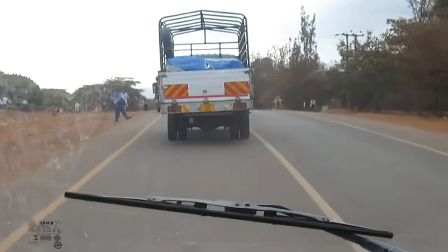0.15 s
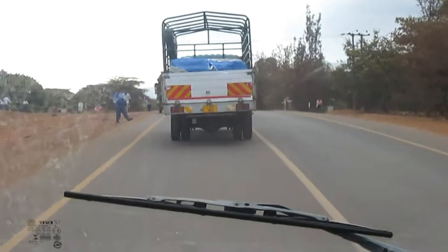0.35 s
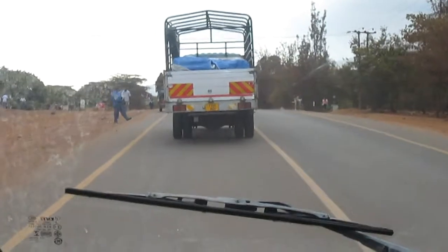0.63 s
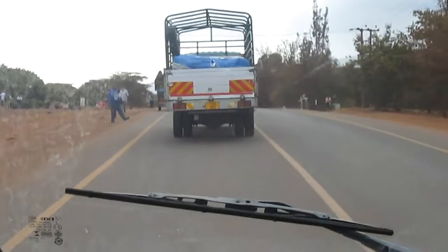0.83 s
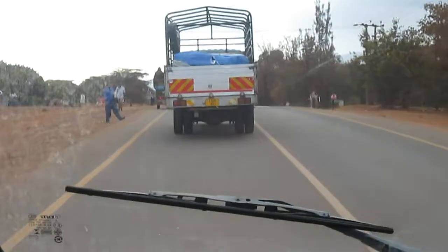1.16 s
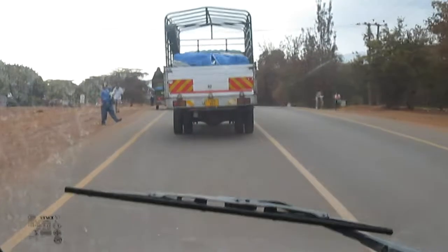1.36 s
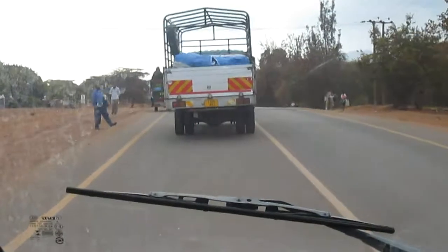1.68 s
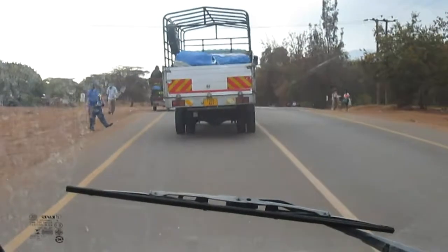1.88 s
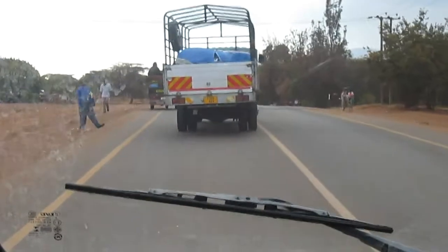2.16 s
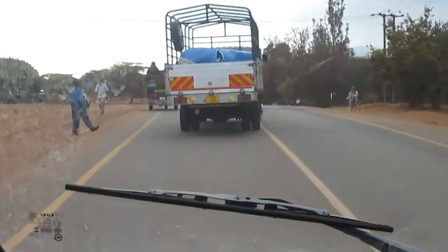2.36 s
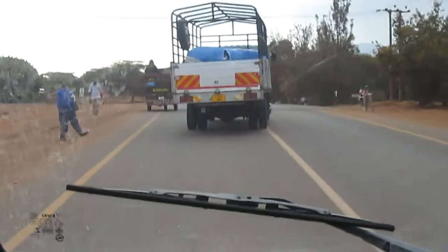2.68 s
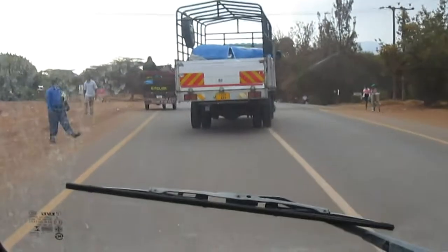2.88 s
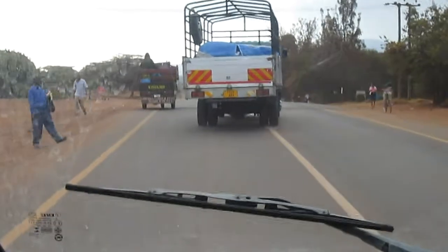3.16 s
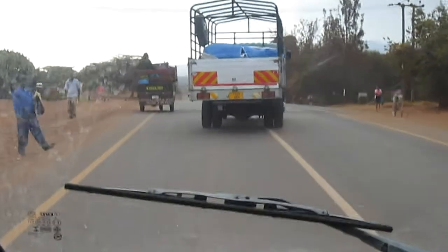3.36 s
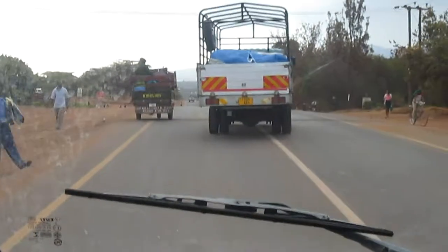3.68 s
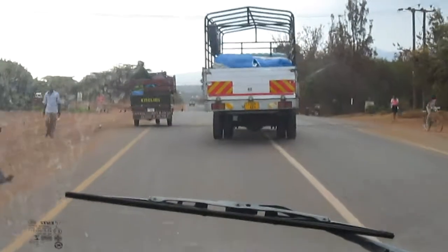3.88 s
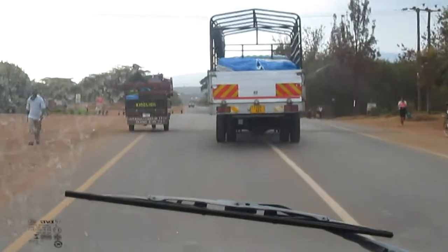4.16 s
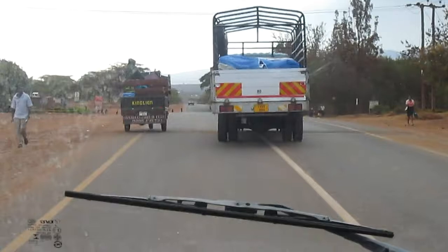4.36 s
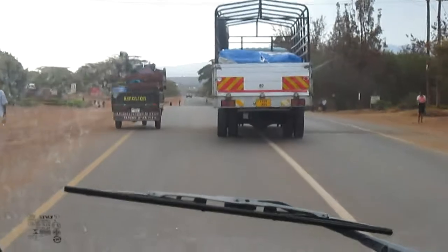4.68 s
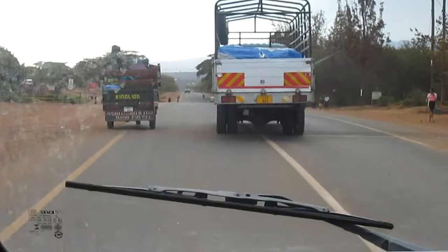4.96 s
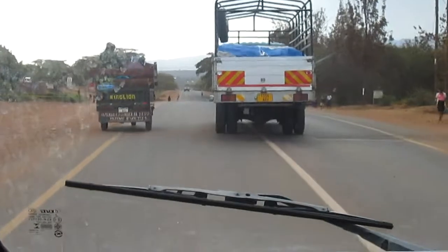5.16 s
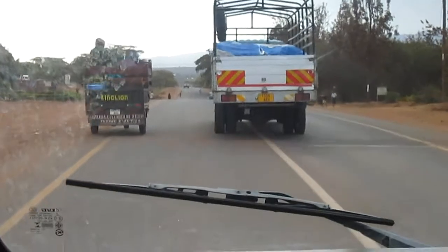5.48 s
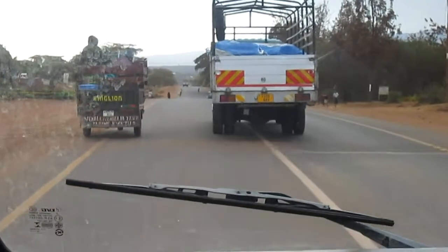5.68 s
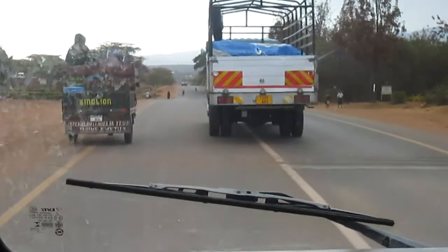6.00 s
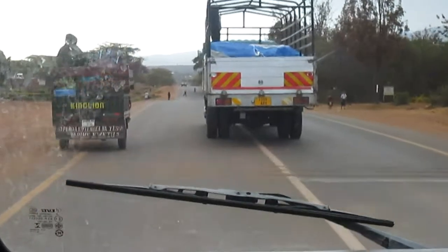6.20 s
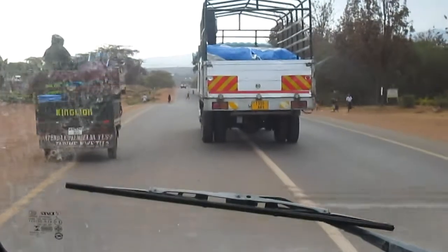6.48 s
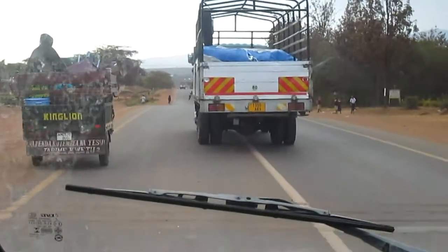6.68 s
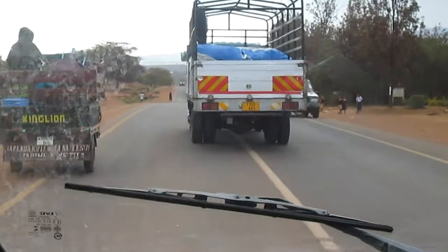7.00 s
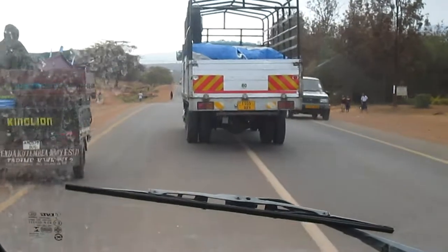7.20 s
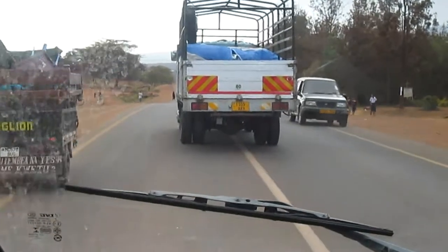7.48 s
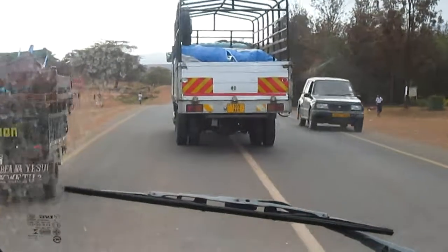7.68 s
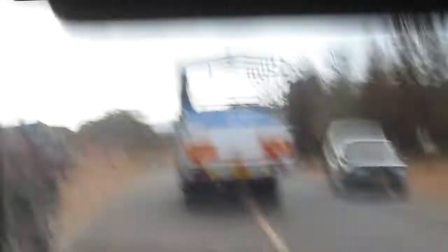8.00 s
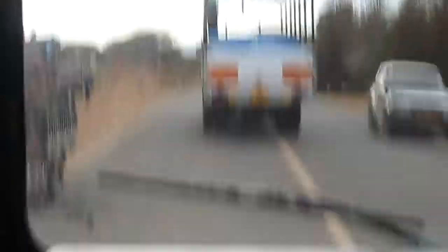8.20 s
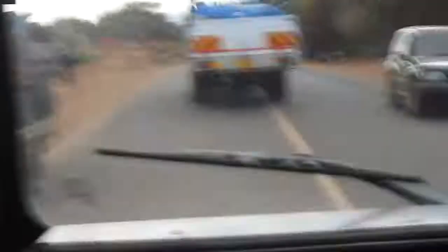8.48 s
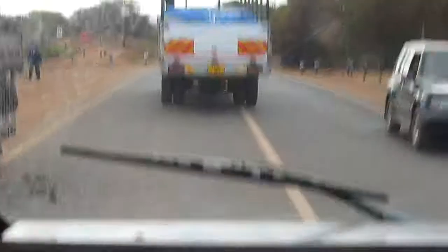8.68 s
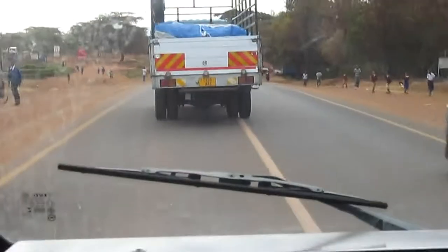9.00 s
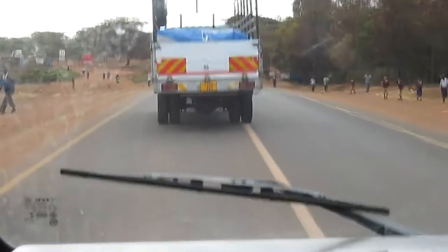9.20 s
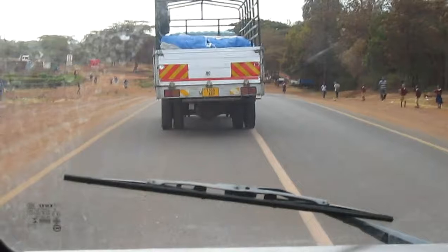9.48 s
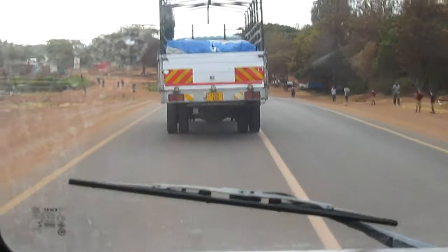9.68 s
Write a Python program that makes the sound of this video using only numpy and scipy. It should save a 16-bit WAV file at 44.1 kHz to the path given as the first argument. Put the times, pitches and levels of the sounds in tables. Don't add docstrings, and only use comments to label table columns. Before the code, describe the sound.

Steady diesel hum and tyre rumble in a cab, with faint belt chirps, two tiny motor buzzes, hard thumps and shaky handling noise.

```python
import sys
import numpy as np
from scipy import signal
from scipy.fft import rfft, irfft, next_fast_len
from scipy.io import wavfile
from scipy.ndimage import uniform_filter1d

SR = 44100
rng = np.random.default_rng(int(sys.argv[2]) if len(sys.argv) > 2 else 0)


def amplitude_ratio(level_db):
    exponent = np.asarray(level_db, float) / 20
    return 10 ** exponent


def dump(signal):
    limited = np.clip(np.atleast_2d(signal).T, -1, 1)
    pcm = np.round(limited * 32767).astype(np.int16)
    wavfile.write(sys.argv[1], SR, pcm)


N = 434385
TIME = np.arange(N) / SR
STEP = 40


def rms_one(x):
    return x / np.sqrt(np.mean(x ** 2) + 1e-20)


def in_time(table):
    s, *columns = np.transpose(table)
    return [np.interp(TIME, s, column) for column in columns]


def chance(rate_hz):
    r = np.exp(-2 * np.pi * STEP * rate_hz / SR)
    lead_in = 2000
    noise = rng.standard_normal(len(TIME[::STEP]) + lead_in)
    return rms_one(signal.lfilter([1], [1, -2 * r, r * r], noise)[lead_in:])


def smooth(steps):
    return np.interp(TIME, TIME[::STEP], steps)


def drift(rate_hz):
    return smooth(chance(rate_hz))


def resonate(x, hz, width_hz):
    r = np.exp(-np.pi * width_hz / SR)
    zeros = np.array([1, 0, -1]) * (1 - r * r) / 2
    poles = [1, -2 * r * np.cos(2 * np.pi * hz / SR), r * r]
    return signal.lfilter(zeros, poles, x + 1e-18)


def colour(spectrum):
    hz, db = np.transpose(spectrum)
    size = next_fast_len(N)
    grid_hz = np.fft.rfftfreq(size, 1 / SR) + 1
    gain = amplitude_ratio(np.interp(np.log(grid_hz), np.log(hz), db))
    return rms_one(irfft(rfft(rng.standard_normal(size)) * gain, size)[:N])


def band(x, low_hz, high_hz, order=2):
    return signal.sosfilt(signal.butter(order, [low_hz, high_hz], "band", fs=SR, output="sos"), x)


def gain_control():
    # start in seconds, quick part in dB, lasting part in dB.
    ducks = [
        (4.981, 8.5, 10),
        (5.6, 1, 12.5),
        (7.265, 8.5, 10),
        (8.06, 2, 10),
        (8.6, 0, 12.5),
    ]
    attack_s, quick_s, lasting_db_per_s = 0.0127, 0.303, 3.5
    depths_db = []
    for start, quick_db, lasting_db in ducks:
        since = np.clip(TIME - start, 0, None)
        recovery_db = quick_db * np.exp(-since / quick_s)
        recovery_db = recovery_db + np.maximum(lasting_db - lasting_db_per_s * since, 0)
        depths_db.append(np.minimum(since / attack_s, 1) * recovery_db)
    return -np.max(depths_db, axis=0)


def road_levels(gain_db):
    # time in seconds, panel noise in dB, unevenness in dB, coarseness in dB.
    surface = [(0, -30.5, -3.5, -1), (.25, -35, 1.05, 1.5), (.6, -34.5, -8, 2), (1.0, -34.5, -3, -1),
               (1.5, -33.5, 3.5, -1), (1.75, -35.5, 0.7, 0), (2.3, -34, 5.5, -2), (2.75, -34, 2.5, -3.5),
               (3.3, -31.5, 0, 1), (3.9, -29.5, -0.67, 0.03), (4.4, -31.5, 3, -1), (4.65, -33, 3.5, 2.5),
               (5.3, -33, 0.68, -1.5), (6.2, -33, -2, 0.04), (6.9, -33, 3.5, 1.08), (7.6, -33.5, 0.07, 0.4),
               (9.2, -33, 0.5, -2.5), (9.85, -30, -3.5, -7)]
    # centre in seconds, half length in seconds, lift of
    # heave, of rumble and of panel noise in dB.
    jolts = [
        (5.57, 0.1, 5, 9.7, 0),
        (7.434, 0.054, 0.5, 6.8, -0.5),
        (7.977, 0.171, 17.3, 0.5, 3.5),
        (8.391, 0.146, 4, 16.5, 13),
        (8.698, 0.126, 10.4, 6.2, 0.5),
    ]
    cruise_db = -34
    belt_duck_share = 0.884
    panel_db, uneven_db, coarse_db = in_time(surface)
    lifts_db = sum(np.outer(lifts, np.exp(-((TIME - s) / half_s) ** 2)) for s, half_s, *lifts in jolts)
    heave, rumble, panel = lifts_db + gain_db
    heave_db = panel_db + 11 + uneven_db + heave + 2.5 * drift(2.8)
    rumble_db = panel_db + 10 + coarse_db + rumble + 1.15 * drift(3)
    chirp_db = cruise_db - 20.5 + 1.17 * (panel_db - cruise_db) + panel - (1 - belt_duck_share) * gain_db
    return heave_db, rumble_db, panel_db + panel, chirp_db


def road(turn, heave_db, rumble_db, panel_db, patchy_db, throb):
    # frequency in Hz, level in dB per Hz.
    roar_colour = [(12, -9), (22, -5), (31, -8), (55, -4.5), (100, -7.5), (170, -8), (400, -15.5),
                   (520, -23.5), (734, -21), (1460, -26.5), (3900, -41.5), (5500, -48), (10100, -55),
                   (15500, -72.5)]
    # frequency in Hz, width in Hz, level over the roar in dB.
    panels = [(550.8, 41, 6), (965.3, 20, 8.5), (1106, 61, 1.5), (1494, 32, 2), (1799, 79, 5.5),
              (2150, 37, 2), (2532, 51, 3.5), (3093, 72, 4)]
    roar = colour(roar_colour)
    roar = roar + sum((amplitude_ratio(db) - 1) * resonate(roar, hz, width_hz) for hz, width_hz, db in panels)
    anchors = [band(roar, 15, 48).std(), band(roar, 160, 450).std(), band(roar, 700, 3500).std()]
    levels_db = np.array([heave_db, rumble_db, panel_db])[:, ::STEP] - 20 * np.log10(anchors)[:, None]
    size = next_fast_len(N)
    spectrum, grid = rfft(roar, size), np.log2(np.fft.rfftfreq(size, 1 / SR) + 1)
    cycle = np.cos(turn[::STEP] / 2 - .6)
    out, together = np.zeros(N), chance(15)
    for octave in np.arange(3.5, 14.6, .5):
        part = irfft(spectrum * np.clip(1 - np.abs(grid - octave) / .5, 0, 1), size)[:N]
        place = np.interp(octave, np.log2([40, 220, 900]), [0, 1, 2])
        level_db = sum(np.clip(1 - abs(place - k), 0, 1) * levels_db[k] for k in range(3))
        fired = 1 + throb * (place > 1) * cycle
        flicker_db = patchy_db * (0.73 * together + chance(42))
        out += part * smooth(fired * amplitude_ratio(level_db + flicker_db))
    return out


def belt(turn, chirp_db):
    # frequency in Hz, width in Hz, level in dB.
    chirps = [
        (4919, 900, 1),
        (5538, 1000, -0.5),
        (9830, 1300, -13.5),
    ]
    lap = turn / 3.07 + 0.23
    out = 0
    for k, (hz, width_hz, db) in enumerate(chirps):
        slip = amplitude_ratio(2.63 * np.cos(lap + .5 * k + .5 * drift(3.3)) + 1.78 * drift(25))
        squeal = resonate(resonate(rng.standard_normal(N), hz, width_hz), hz, width_hz)
        out = out + amplitude_ratio(db) * rms_one(slip * squeal)
    return amplitude_ratio(chirp_db - 1.0) * out


def lens_motor(gain_db):
    # start in seconds, end in seconds, level in dB.
    runs = [
        (1.933, 2.471, -57.5),
        (7.085, 7.82, -56),
    ]
    # frequency in Hz, width in Hz, level in dB.
    barrel = [(5880, 120, 0), (6600, 120, 2), (7500, 120, -2), (8620, 150, -14), (11260, 150, -13),
              (11990, 200, -19), (12570, 200, -17), (13850, 250, -21), (14890, 250, -22)]
    teeth_per_s = 82 * amplitude_ratio(.8 * drift(30))
    ticks = np.diff(np.floor(np.cumsum(teeth_per_s) / SR), prepend=0) * amplitude_ratio(rng.normal(0, 1.4, N))
    ticks = ticks + 0.072 * rng.standard_normal(N)
    since_s = np.minimum(*[np.where(TIME > run[0], TIME - run[0], 9) for run in runs])
    top = amplitude_ratio(-9.0 * np.clip((since_s - .26) / .08, 0, 1))
    buzz = 0
    for hz, width_hz, db in barrel:
        ring = resonate(resonate(ticks, hz, width_hz), hz, 3 * width_hz)
        buzz = buzz + (top if hz > 8000 else 1) * amplitude_ratio(db) * rms_one(ring)
    running = sum(amplitude_ratio(db) * ((TIME > start) & (TIME < end)) for start, end, db in runs)
    return amplitude_ratio(gain_db + 1.5 * drift(8)) * uniform_filter1d(running, size=800) * buzz


def hand():
    # start in seconds, end in seconds, level in dB, seconds to swell and fade by 20 dB.
    rubs = [(5.292, 5.31, -75.5, 0.04), (5.39, 5.415, -70.5, 0.22), (5.475, 5.501, -72.5, 0.18),
            (5.841, 5.844, -76, 0.04), (6.088, 6.092, -74, 0.08), (7.873, 7.963, -54, 0.1257),
            (7.97, 8.121, -57, 0.1029), (8.29, 8.468, -55.5, 0.1418), (8.5, 8.557, -63, .08),
            (8.6, 8.718, -76, 0.08), (9.699, 9.86, -68.5, 0.24)]
    # frequency in Hz, level in dB per Hz.
    scratch_colour = [(120, -46), (200, 3.5), (304, 7), (515, -7), (874, -4), (1380, -12), (8500, -31.5),
                      (15500, -45)]
    scratch = colour(scratch_colour) * amplitude_ratio(3.94 * drift(120) + 0.91 * drift(27))
    scratch = scratch + 0.67 * resonate(scratch, 3725, 500)
    levels_db = []
    for start, end, db, fade_s in rubs:
        outside_s = np.maximum(np.maximum(start - TIME, TIME - end), 0)
        levels_db.append(db - 20 * outside_s / fade_s)
    return amplitude_ratio(np.max(levels_db, axis=0)) * scratch / band(scratch, 10370, 17840).std()


def knocks():
    # time in seconds, thud in dB, thud in Hz, crack in dB.
    pushes = [(5.03, -16, 170, -39), (5.489, -8, 113.6, -35), (5.503, -6.5, 116.6, -34.5),
              (5.537, -14.5, 180, -24), (5.585, -10.5, 250, -23.5), (5.596, -16, 167, -39),
              (7.4804, -6, 100.4, -23), (8.382, -6.5, 253, -23.5), (8.482, -5, 281, -29.5)]
    # time in seconds, thud in dB, thud in Hz, crack in dB.
    pulls = [(4.864, -2.5, 123.5, -17.5), (4.968, -6, 260, -14.5), (4.9725, 2, 69.7, -6),
             (4.978, -4, 330, -5.5), (5.084, -7.5, 143, -11.5), (5.132, -14, 170, -34.5),
             (5.562, -4, 238.4, -14.5), (5.572, -4.5, 299, -4), (7.2424, -2.5, 264, -42.5),
             (7.2465, 3, 160.8, -39.5), (7.255, -10.5, 249.4, -27), (7.2595, 0.5, 259, -13.5),
             (7.459, -9.5, 190, -43), (7.916, -7.5, 151, -21.5), (8.041, -8.5, 107, -22.5),
             (8.218, -4.5, 139.6, -21.5), (8.543, -20.5, 200, -22)]
    out, t = np.zeros(N), np.arange(1800) / SR
    blows = [(*row, 1) for row in pushes] + [(*row, -1) for row in pulls]
    for s, thud_db, hz, crack_db, push in blows:
        window = np.sin(np.pi * np.minimum(t * hz / 1.301, 1)) ** 2 * np.exp(-t * hz / 0.81)
        swing = np.sin(2 * np.pi * hz * t) * window
        crack = band(rng.standard_normal(len(t)), 409, 780) * t * np.exp(-t / 0.00173)
        at = round(s * SR)
        out[at:at + len(t)] += amplitude_ratio(thud_db) * push * swing / np.abs(swing).max()
        out[at:at + len(t)] += amplitude_ratio(crack_db) * crack / np.abs(crack).max()
    return signal.sosfilt(signal.butter(4, 1950, fs=SR, output="sos"), out)


def clatter(turn, panel_db):
    # share of the cycle, level in dB.
    contacts = [(.04, -4), (.13, -3), (.21, -5), (.43, -4), (.52, -8), (.67, -7), (.79, 0), (.88, -2),
                (.95, -4)]
    # frequency in Hz, width in Hz, level in dB.
    block = [(557, 8.5, -2), (945.5, 26, 0), (1177, 100, -0.5), (1302, 68, -5), (1457, 46, 0.5),
             (1599, 50, -3), (1800, 120, -2), (2180, 100, -6), (2544, 150, -7.5), (2822, 110, -12)]
    cycle = turn / (4 * np.pi) + .04
    taps = []
    for share, db in contacts:
        count = np.floor(cycle - share)
        taps.append(amplitude_ratio(db) * np.diff(count, prepend=count[0]))
    taps = np.array(taps) * amplitude_ratio(rng.normal(0, 1.0, N))
    shape = (len(block), len(contacts))
    grip = amplitude_ratio(rng.normal(0, 3, shape)) * rng.choice([-1, 1], shape)
    rings = 0
    for (hz, width_hz, db), strength in zip(block, grip):
        rings = rings + amplitude_ratio(db) * rms_one(resonate(strength @ taps, hz, width_hz))
    return amplitude_ratio(panel_db - 4) * rms_one(band(rings, 300, 3600))


def boom(order_hz, hz, half_width_hz, top_db):
    return top_db - 10 * np.log10(1 + ((order_hz - hz) / half_width_hz) ** 6)


def engine(turn, rate, gain_db, panel_db, heave_db):
    # multiple of crank rate, level over panel noise in dB.
    orders = [(1, 4), (3, 7), (5, -2), (6, 4.5), (7, 2), (7.5, -4), (8, -2), (9, -6), (10, -1), (13, -9),
              (14, -8), (15, -10), (16, -9), (18, -11), (19.5, -15), (28.5, -18), (30, -18), (30.5, -21),
              (34.5, -14), (36, -13), (36.5, -16), (38.5, -17), (42, -17), (43, -16), (44, -16),
              (46.5, -19), (52, -19)]
    # time in seconds, level offset in dB.
    throttle = [(0, 11.5), (.3, 0.5), (.8, -3.5), (1.7, -4), (2.25, 2), (2.9, -6), (3.4, -2.5),
                (3.85, -11.5), (4.3, -0.5), (4.7, -12), (5.5, -5.5), (6.1, -20), (6.7, -7), (7.2, -21.5),
                (8.0, -8.5), (8.5, -3.5), (9.1, -8.5), (9.85, -19)]
    # time in seconds, frequency in Hz.
    driveline = [(0, 137), (5, 140), (5.6, 143.5), (7.1, 138.5), (8.2, 135.5), (9.85, 130)]
    # time in seconds, hum in dB.
    torque = [(0, -15.5), (.35, -26.5), (.85, -22.5), (1.3, -29.5), (1.9, -22), (2.4, -37.5), (3.6, -43),
              (4.0, -17.5), (4.45, -35), (5.5, -29), (5.9, -16.5), (7.1, -15), (8.0, -17), (8.5, -31.5),
              (9.1, -20.5), (9.6, -18.5), (9.85, -24)]
    whine_boom_hz, whine_boom_width_hz, whine_boom_gain = 958.6, 22, 2.42

    firing_db = boom(2 * rate, hz=61.79, half_width_hz=2.94, top_db=-15.5) + gain_db
    out = amplitude_ratio(firing_db + 3.0 + 1.5 * drift(5)) * np.sin(2 * turn + .12 * drift(3))

    double_db = boom(4 * rate, hz=130, half_width_hz=6.47, top_db=-14.5) + in_time(throttle)[0] + gain_db
    out += amplitude_ratio(double_db + 4.5 + 2.25 * drift(7.9)) * np.sin(4 * turn - np.pi / 2 + 0.11 * drift(4.0))

    panel = amplitude_ratio(panel_db[::STEP])
    for multiple, db in orders:
        off_boom = (multiple * rate[::STEP] - whine_boom_hz) / whine_boom_width_hz
        sung = 1 + whine_boom_gain / (1 + off_boom ** 2)
        level = smooth(panel * sung * amplitude_ratio(db + 2.124 * chance(5.2)))
        phase = smooth(0.43 * chance(4.01) + multiple)
        out += level * np.sin(multiple * turn + phase)

    out += amplitude_ratio(heave_db + 1.5 + 1.4 * drift(2.5)) * np.sin(.66 * turn + .4 * drift(2.5))

    shaft = 2 * np.pi * np.cumsum(in_time(driveline)[0]) / SR
    hum_db = in_time(torque)[0] + gain_db
    return out + amplitude_ratio(hum_db + 2.4 + 2.5 * drift(5)) * np.sin(shaft + .5 * drift(5))


def scene():
    # time in seconds, turns per second.
    crank = [(0, 29.6), (.4, 30.35), (1, 31.02), (2, 32.05), (2.6, 32.8), (3.3, 33.2), (3.9, 33.47),
             (4.4, 33.53), (5, 33.4), (6, 32.8), (6.5, 32.4), (7.5, 31.5), (8, 31.15), (9, 31.15),
             (9.85, 30.9)]
    rate, gain_db = in_time(crank)[0], gain_control()
    turn = 2 * np.pi * np.cumsum(rate) / SR
    heave_db, rumble_db, panel_db, chirp_db = road_levels(gain_db)
    cab = road(turn, heave_db - 5.5, rumble_db - .8, panel_db - 2, patchy_db=0.67, throb=0.044)
    cab = cab + clatter(turn, panel_db) + engine(turn, rate, gain_db, panel_db, heave_db)
    return (cab + belt(turn, chirp_db) + lens_motor(gain_db) + hand() + knocks())[None]


def roll_off(x):
    return signal.sosfilt(signal.butter(12, 15710, fs=SR, output="sos"), x)


def record(dry):
    # frequency in Hz, width in Hz.
    notches = [(3920, 170), (7840, 220)]
    # start in seconds, end in seconds, kick on return in dB, kick direction.
    drops = [(7.977, 7.983, -12, 1), (8.203, 8.212, -18, -1), (8.230, 8.240, -12, 1),
             (8.287, 8.296, -7, -1), (8.307, 8.329, -11, 1), (8.357, 8.374, -10, -1),
             (8.388, 8.398, -20, 1), (8.404, 8.415, -7, 1), (8.434, 8.448, -10, -1), (8.487, 8.497, -7, 1),
             (8.515, 8.531, -12, -1), (8.556, 8.563, -20, 1), (8.589, 8.603, -11, -1)]
    settle_s, leak_s, rise_s, kick_s = .0012, .0007, .0003, 0.0115
    x = dry[0] * np.minimum(TIME / .004, 1)
    for hz, width_hz in notches:
        x -= .92 * resonate(x, hz, width_hz)
    back = TIME[:700]
    rise = 1 - np.exp(-back / rise_s)
    for start, end, kick_db, push in drops:
        a, b = round(start * SR), round(end * SR)
        slope = np.clip((x[a] - x[a - 8]) / (8 / SR), -150, 150)
        held = TIME[:b - a]
        coast = (x[a] + (slope + x[a] / settle_s) * held) * np.exp(-held / settle_s)
        leak = (.002 + np.exp(-held / leak_s)) * (x[a:b] - x[a] - slope * held)
        x[a:b] = coast + leak
        kick = push * amplitude_ratio(kick_db) * np.exp(-back / kick_s)
        x[b:b + len(back)] = rise * (x[b:b + len(back)] + kick)
    return roll_off(np.tanh(0.8852 * x)[None] / 0.9443)


dry = scene()
out = record(dry)
dump(out)
```